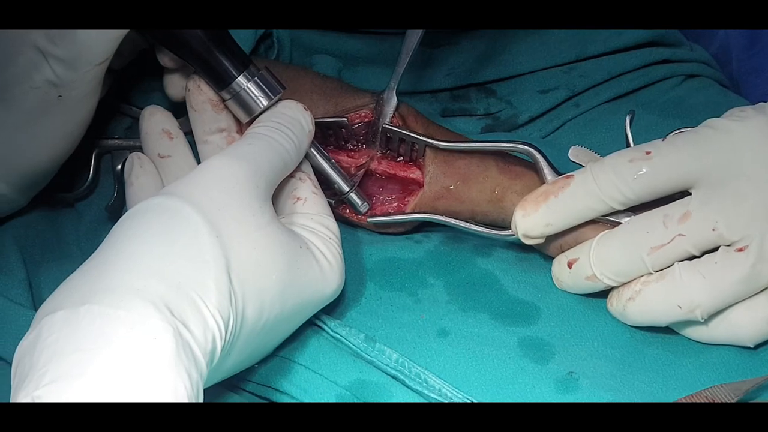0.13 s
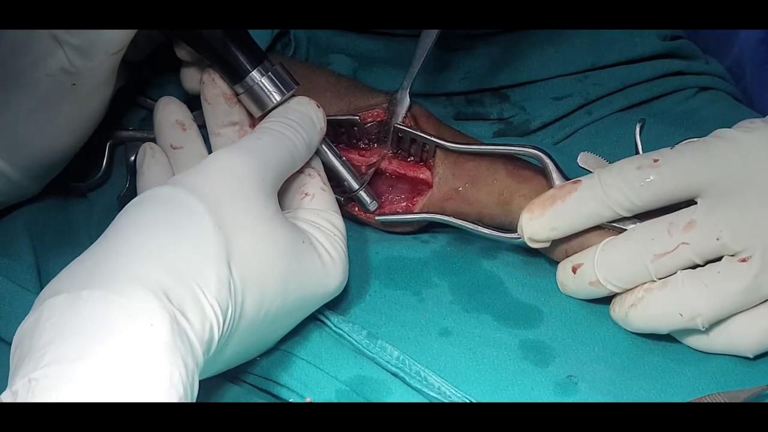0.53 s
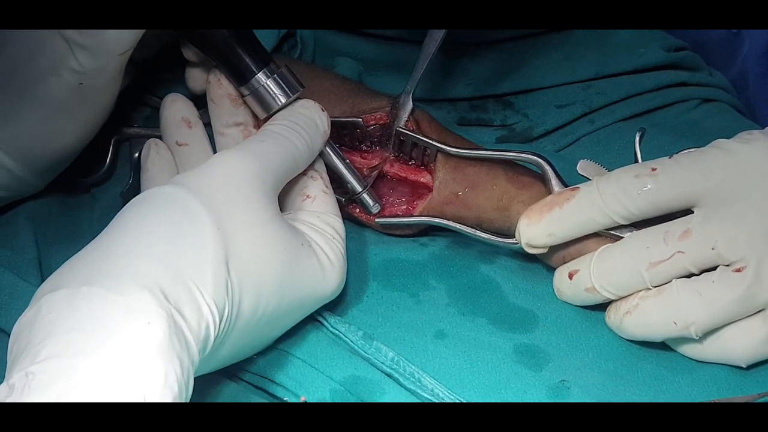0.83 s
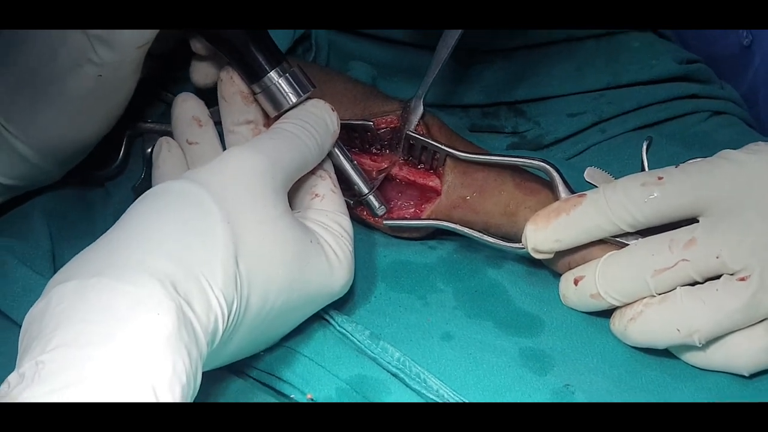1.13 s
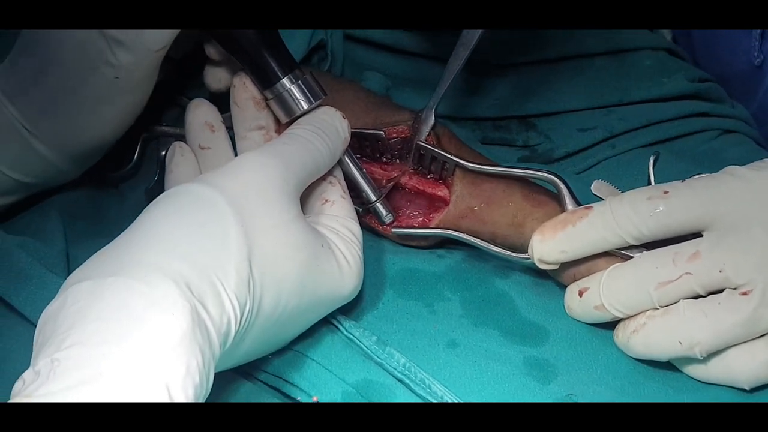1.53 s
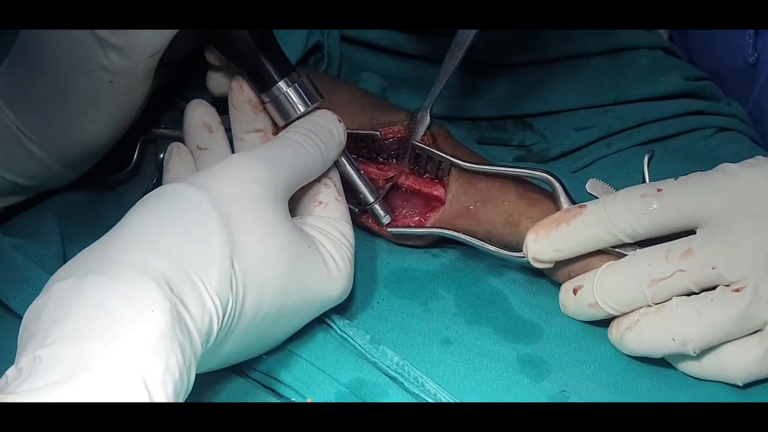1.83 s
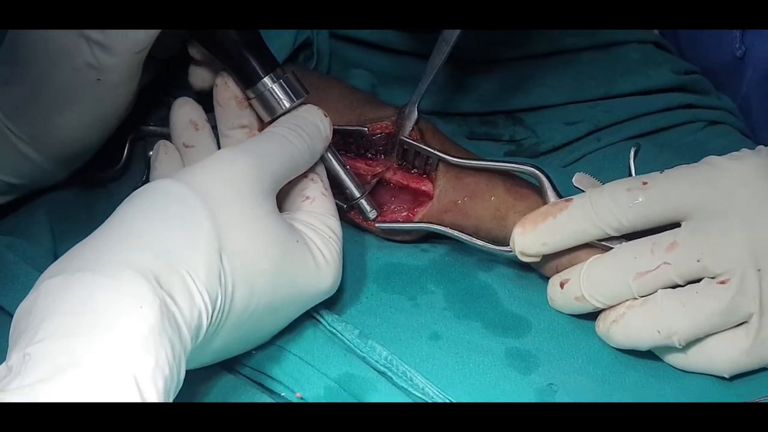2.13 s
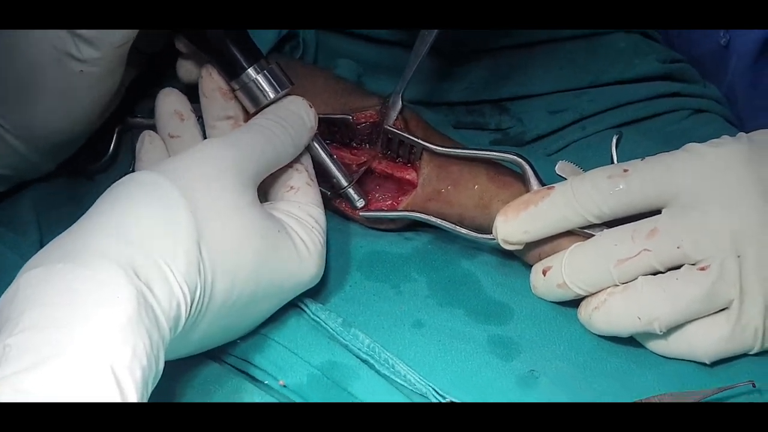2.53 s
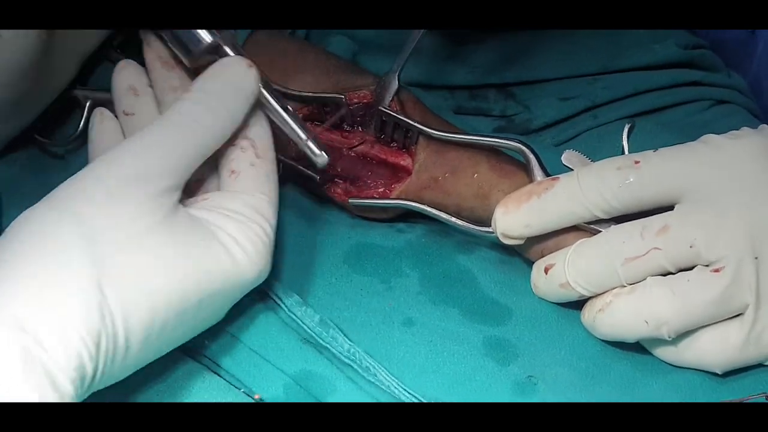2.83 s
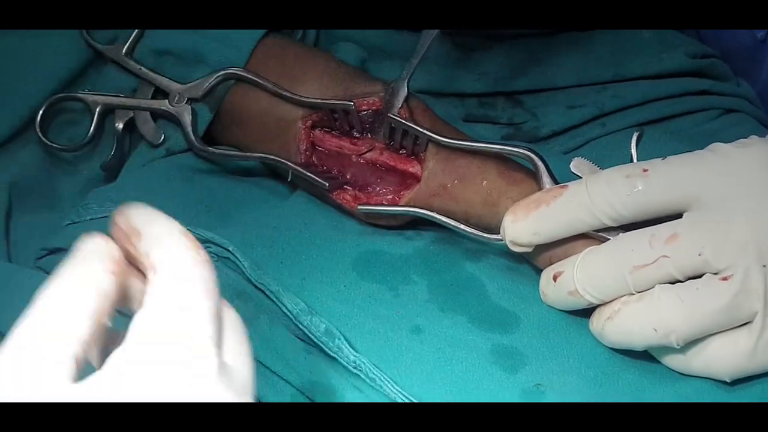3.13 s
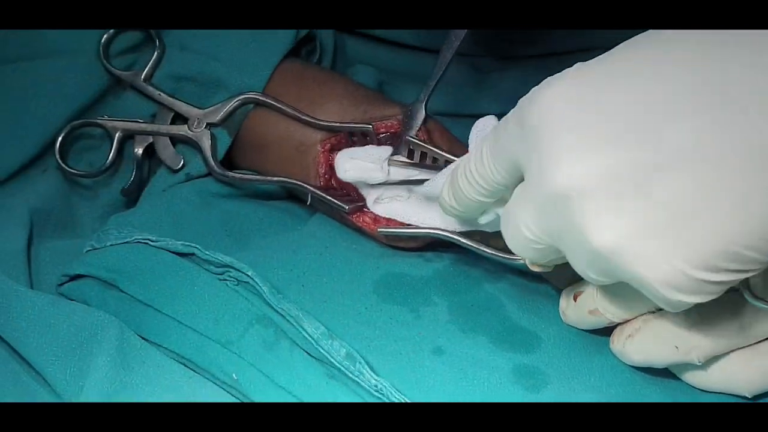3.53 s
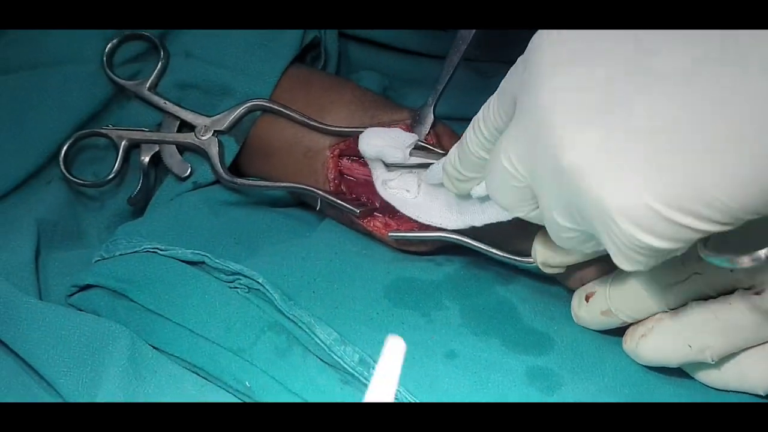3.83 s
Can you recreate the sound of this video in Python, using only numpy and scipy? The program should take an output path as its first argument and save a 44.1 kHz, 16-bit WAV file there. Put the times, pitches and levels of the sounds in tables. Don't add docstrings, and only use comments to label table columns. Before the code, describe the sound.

Air-driven bone drill whirs shrilly, bites harshly several times, then its hiss dies into room hum.

```python
import sys
import numpy as np
from scipy import signal
from scipy.fft import rfft, irfft
from scipy.io import wavfile
from scipy.ndimage import uniform_filter1d

SR = 44100
rng = np.random.default_rng(int(sys.argv[2]) if len(sys.argv) > 2 else 0)


def volts_from_decibels(level):
    exponent = np.asarray(level, float) / 20
    return 10 ** exponent


def generate_wav(signal):
    frames = np.transpose(np.atleast_2d(signal))
    scaled = np.clip(frames, -1, 1) * 32767
    pcm = np.round(scaled).astype(np.int16)
    wavfile.write(sys.argv[1], SR, pcm)


N = 176400
T = np.arange(N) / SR
BINS_HZ = np.fft.rfftfreq(1024, 1 / SR)
OFF_S = 3.16

# t/s, f/Hz (turns per second)
SHAFT_SPEED = [(0, 487.2), (.19, 488.2), (.31, 483), (.48, 478.9), (.53, 488), (.7, 489.4), (.82, 481),
               (1.15, 488.5), (1.3, 481.2), (1.75, 477.7), (1.97, 476.8), (2.05, 488.9), (2.26, 492.5),
               (2.4, 480), (2.57, 476.8), (2.68, 479.8), (2.76, 489.6), (3.16, 489)]
# t/s, level/dB
AIR_FLOW = [
    (0, 1),
    (2.9, 0.5),
    (3.15, -1),
    (3.25, -3.5),
    (3.5, -10),
    (3.7, -14),
    (4, -19.5),
]
# f/Hz, left minus right/dB
FREE_BALANCE = [(500, -6.5), (1200, -1.5), (2100, -5), (4250, -18), (7300, -10), (8400, -1.5), (9400, 8.5),
                (11200, 0)]


def evened(x):
    return x / np.sqrt(np.mean(x ** 2) + 1e-20)


def read(points, hz):
    f, value = np.transpose(points)
    return np.interp(np.log(hz + 1), np.log(f + 1), value)


def curve(points):
    return np.interp(T, *np.transpose(points))


def hump(hz, centre_hz, width_hz):
    return 1 / (1 + ((hz - centre_hz) / width_hz) ** 2)


def sides(balance_db):
    return volts_from_decibels(np.outer([.5, -.5], balance_db))


def wander(per_s, count):
    step, points = 128, 2048
    slowness = 1 + (np.fft.rfftfreq(points, step / SR) / per_s) ** 2
    slow = irfft(rfft(rng.standard_normal((count, points)), axis=1) / slowness, axis=1)
    return [np.interp(T, np.arange(points) * step / SR, v / v.std()) for v in slow]


def noise(colour_db, balance_db, patchy_db):
    # f/Hz, share
    likeness = [(30, .1), (100, 0.72), (500, 0.42), (1500, 0.12), (4000, 0), (9000, -0.065), (14000, -0.44)]
    a, b, c, d, patches = rng.standard_normal((N // 256 + 5, len(BINS_HZ), 5)).T
    patches = uniform_filter1d(patches, size=10, axis=0)
    patches = evened(uniform_filter1d(patches, size=12, axis=1))
    same = np.clip(read(likeness, BINS_HZ), -1, 1)[:, None]
    left = a + 1j * b
    right = same * left + np.sqrt(1 - same ** 2) * (c + 1j * d)
    level = volts_from_decibels(colour_db[:, None] + patchy_db * patches)
    z = np.array([left, right]) * level * sides(balance_db)[:, :, None]
    return evened(signal.istft(z, nperseg=1024, noverlap=768)[1][:, :N])


def orders(gains, angle, waver_db, waver_per_s, jitter_rad):
    # f/Hz, phase/rad
    left_lead = [(500, 0.3), (2500, 0.24), (4300, 2.4), (9000, 2.2), (14000, 1.9)]
    apart_rad, apart_db = 0.6, 1.5
    out = np.zeros((2, N))
    for k, (left, right) in gains.items():
        swell, drift, other = wander(waver_per_s, count=3)
        gain = volts_from_decibels(waver_db * swell)
        jitter = jitter_rad * wander(45, count=1)[0]
        start = 0.55 * rng.standard_normal()
        phase = 2 * np.pi * k * angle + start + jitter
        lead = read(left_lead, k * SHAFT_SPEED[0][1])
        out[0] += gain * left * np.cos(phase + apart_rad * drift / 2)
        out[1] += gain * right * volts_from_decibels(apart_db * other) * np.cos(phase - lead - apart_rad * drift / 2)
    return out


def room():
    # f/Hz, level/dB
    wash_db = [(25, -26), (70, -24), (115, -6.5), (200, -3.5), (450, -6.5), (900, -12.5), (2000, -5.5),
               (4000, -29)]
    balance_db = -4.5
    wash = noise(read(wash_db, BINS_HZ), balance_db, patchy_db=2.5)
    hum_db = 51 * np.log10(hump(BINS_HZ, 104.05, 12))
    hum = noise(hum_db, balance_db, patchy_db=3)
    return volts_from_decibels(-48.5) * wash + volts_from_decibels(-47.5) * hum


def whistle(centre_hz, width_hz, patchy_db):
    colour_db = 20 * np.log10(hump(BINS_HZ, centre_hz, width_hz))
    return noise(colour_db, read(FREE_BALANCE, BINS_HZ), patchy_db)


def hose():
    return volts_from_decibels(-38 + 0.46 * curve(AIR_FLOW)) * whistle(4197, 415, patchy_db=-0.5)


def puff():
    middle_s, length_s = 3.06, 0.1
    swell = np.exp(-((T - middle_s) / length_s) ** 2)
    return volts_from_decibels(-32) * swell * whistle(6800, 400, patchy_db=1)


def exhaust():
    # f/Hz, level/dB
    hiss_db = [(1400, -32), (1900, -17), (3300, -15.5), (4300, -12.5), (6600, -9), (8000, -8.5),
               (11400, -5.5), (14500, -13.5)]
    # f/Hz, width/Hz, level/dB
    jets = [
        (9330, 360, 6.5),
        (11860, 79, 5),
        (8200, 430, -2.5),
        (5690, 1400, -1),
    ]
    flow_db = curve(AIR_FLOW)
    colour_db = read(hiss_db, BINS_HZ) + sum(db * hump(BINS_HZ, f, w) for f, w, db in jets)
    hiss = noise(colour_db, read(FREE_BALANCE, BINS_HZ), patchy_db=1.5)
    top = signal.sosfiltfilt(signal.butter(4, 13670, "high", fs=SR, output="sos"), hiss)
    hiss = hiss - top * (1 - volts_from_decibels(flow_db))
    return volts_from_decibels(-25 + flow_db) * hiss


def turns():
    coast_s = 1.1
    hz = curve(SHAFT_SPEED) * np.exp(-np.maximum(T - OFF_S, 0) / coast_s)
    return np.cumsum(hz) / SR


def pressure():
    # start t/s, end t/s, force level/dB, release/s
    bites = [
        (0.236, 0.46, -2, 0.053),
        (0.365, 0.44, -13, 0.026),
        (0.707, 0.933, -2, 0.093),
        (0.875, .9, -14.5, 0.042),
        (1.168, 1.977, -5, 0.022),
        (1.23, 1.913, -7, 0.048),
        (2.253, 2.671, -5.5, 0.041),
        (2.348, 2.631, -9, .04),
        (2.761, 2.813, -6, 0.037),
    ]
    rise_s = 0.036
    force = np.zeros(N)
    for start_s, end_s, db, release_s in bites:
        push = np.minimum((T - start_s) / rise_s + .5, (end_s - T) / release_s + .5)
        force += volts_from_decibels(db) * np.clip(push, 0, 1)
    return force


def grinding(angle, force):
    # f/Hz, level/dB
    grind_db = [(1800, -35), (3000, -21), (4300, -13), (7500, -13), (9000, -2), (10600, 0), (13000, -5),
                (14500, -8)]
    # f/Hz, left minus right/dB
    bite_balance = [(500, -9), (1200, -14), (2400, -15), (4500, -9), (7300, -10.5), (8600, -1),
                    (9800, 13.5), (11400, -6)]
    depth, decay_turns = 0.6, 0.25
    pulse = evened(np.exp(-((angle + 0.19) % 1) / decay_turns))
    gate = 1 - depth + depth * pulse
    grind = noise(read(grind_db, BINS_HZ), read(bite_balance, BINS_HZ), patchy_db=5.5)
    return volts_from_decibels(-31) * force * grind * gate


def knock(angle, force):
    # left level/dB, right level/dB
    skimming = [(-44, -37), (-44, -32), (-41, -34), (-59, -34), (-43, -35), (-50, -31), (-47, -32),
                (-41, -26), (-40, -29), (-40, -33), (-45, -34), (-58, -37), (-44, -36), (-34, -39),
                (-37, -38), (-24, -36), (-27, -32), (-24, -35), (-29, -34), (-27, -35), (-37, -31),
                (-32, -35), (-35, -37), (-42, -46), (-38, -39), (-53, -53), (-45, -44)]
    entering = [(-44, -34), (-51, -37), (-44, -30), (-40, -31), (-46, -41), (-45, -32), (-47, -28),
                (-38, -25), (-43, -26), (-38, -29), (-40, -29), (-56, -32), (-47, -36), (-42, -35),
                (-23, -45), (-19, -38), (-28, -31), (-24, -39), (-25, -27), (-28, -33), (-38, -33),
                (-32, -40), (-34, -30), (-42, -36), (-39, -38), (-40, -45), (-37, -39)]
    deep = [(-48, -35), (-41, -33), (-45, -31), (-41, -30), (-52, -46), (-46, -26), (-62, -33), (-43, -27),
            (-38, -36), (-45, -33), (-41, -25), (-47, -33), (-44, -35), (-41, -40), (-39, -52), (-20, -38),
            (-27, -35), (-22, -41), (-25, -31), (-26, -26), (-38, -32), (-42, -33), (-36, -34), (-41, -33),
            (-38, -32), (-37, -34), (-44, -42)]
    slanted = [(-46, -38), (-43, -36), (-43, -33), (-42, -33), (-46, -33), (-44, -32), (-53, -31),
               (-44, -28), (-39, -31), (-42, -37), (-47, -28), (-49, -38), (-45, -28), (-39, -44),
               (-38, -41), (-28, -42), (-24, -38), (-23, -37), (-25, -29), (-35, -31), (-33, -32),
               (-35, -36), (-51, -38), (-44, -37), (-35, -35), (-45, -38), (-41, -40)]
    # t/s, seating 0-3 in the order above
    seating = [
        (0, 0),
        (1.05, 0),
        (1.1, 1),
        (1.4, 1),
        (1.65, 2),
        (2.1, 2),
        (2.2, 3),
    ]
    rings = volts_from_decibels(np.array([skimming, entering, deep, slanted]))
    share = np.maximum(1 - abs(curve(seating) - np.arange(len(rings))[:, None]), 0)
    gains = {k: rings[:, row].T @ share for row, k in enumerate(range(4, 31))}
    return volts_from_decibels(1.2) * force * orders(gains, angle, waver_db=1.7, waver_per_s=7, jitter_rad=0.22)


def whine(angle, force):
    # order, level/dB
    free_orders = [(1, -16), (2, -11.5), (3, -16), (4, -13), (5, -10), (6, -16), (7, -10), (8, -8.5),
                   (9, -10.5), (10, -16)]
    # middle t/s, half length/s, order, level/dB
    songs = [(0.576, .1, 9, 11.5), (0.945, 0.047, 8, 8.5), (0.993, 0.046, 9, 14.5), (1.177, .03, 8, 7),
             (1.187, 0.053, 9, 9), (1.974, 0.0072, 9, 19.5), (2.099, 0.032, 9, 11), (2.157, 0.0888, 8, 7),
             (2.3, 0.032, 9, 9), (2.76, 0.04, 8, 7), (3.125, 0.049, 10, 13.5)]
    strain_db = {1: 7, 2: 3, 3: 4.5, 4: -2.5, 6: 2.5, 7: -9}
    lift_db = {1: -13, 8: 11}
    lift_s, lift_rise_s = 2.85, 0.1
    lift = np.clip((T - lift_s) / lift_rise_s + .5, 0, 1)
    fade_db = -21 * np.maximum(T - OFF_S, 0)
    gains = {}
    for order, db in free_orders:
        k = round(order)
        level_db = db + lift_db.get(k, 0) * lift + k * fade_db + strain_db.get(k, 0) * force
        for middle_s, half_s, sung, song_db in songs:
            if round(sung) == k:
                level_db = level_db + song_db * np.exp(-((T - middle_s) / half_s) ** 4)
        gains[k] = sides(read(FREE_BALANCE, k * SHAFT_SPEED[0][1])) * volts_from_decibels(level_db)
    return volts_from_decibels(-36) * orders(gains, angle, waver_db=2.2, waver_per_s=22, jitter_rad=0.5)


def drill():
    # t/s, left minus right/dB
    swing = [
        (0, 0.91),
        (2.9, 1),
        (3.3, -2.2),
        (4, -4),
    ]
    angle, force = turns(), pressure()
    air = hose() + puff() + exhaust()
    tool = air + grinding(angle, force) + knock(angle, force) + whine(angle, force)
    return tool * sides(curve(swing))


def scene():
    low_cut = signal.butter(1, 80, "high", fs=SR, output="sos")
    return signal.sosfilt(low_cut, room() + drill())


def top_cut(x):
    return signal.sosfilt(signal.butter(12, 15760, fs=SR, output="sos"), x)


def record(dry):
    return top_cut(dry)


dry = scene()
out = record(dry)
generate_wav(out)
```